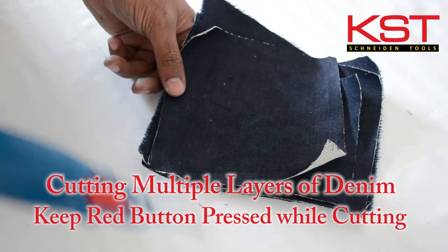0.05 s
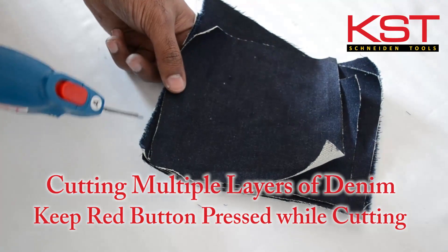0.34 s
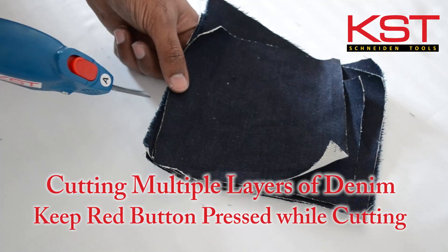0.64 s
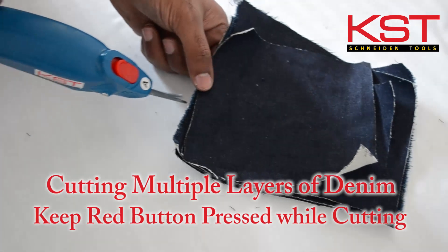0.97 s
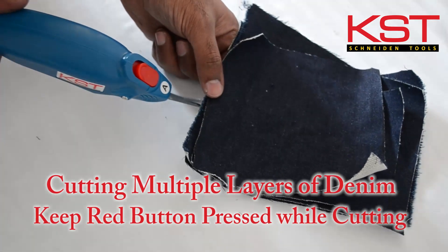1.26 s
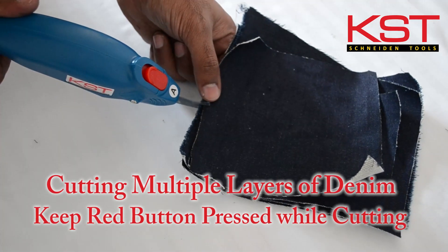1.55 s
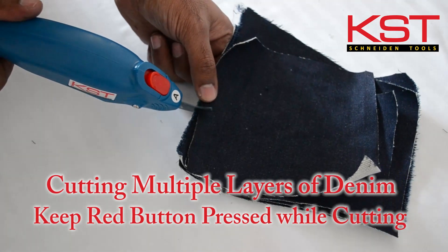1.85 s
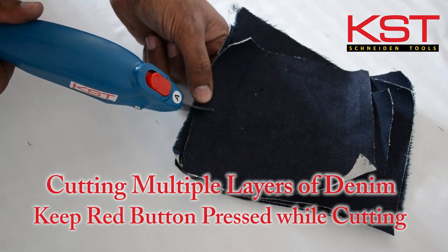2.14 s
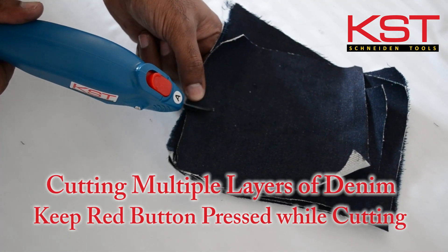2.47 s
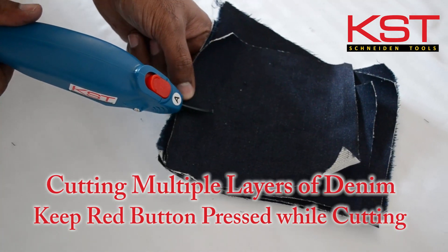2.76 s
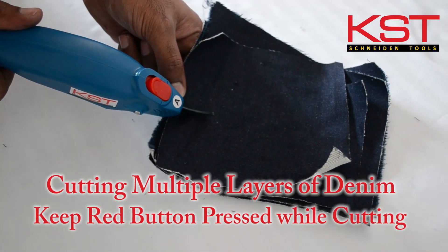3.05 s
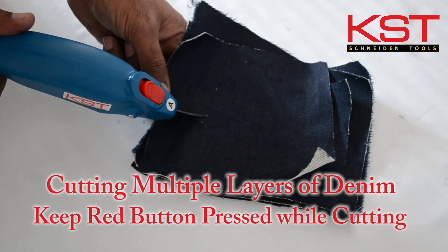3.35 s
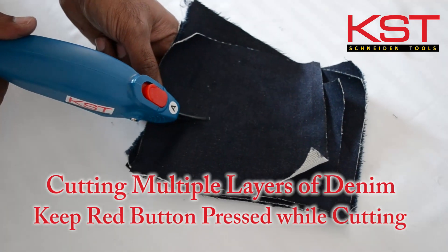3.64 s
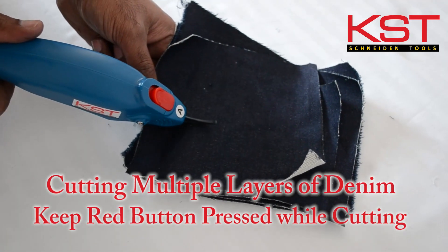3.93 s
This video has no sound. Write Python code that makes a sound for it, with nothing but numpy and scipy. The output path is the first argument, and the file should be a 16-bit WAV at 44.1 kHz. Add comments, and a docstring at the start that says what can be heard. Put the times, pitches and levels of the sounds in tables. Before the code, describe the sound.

Handheld electric fabric cutter switching on with a rattling buzz and sawing into stacked cloth.

```python
"""A cordless electric cutter in a stack of denim on a table.
First cloth rustles and a thumb finds the button. At 0.6 s the switch snaps and the motor spins up,
its brushes fizzing. It runs free: the blade shuttles about 73 times a second and knocks at both ends
of each stroke, over a gear whine. From 2 s it bites into the cloth: the motor sags, the return knock
comes later, and each forward stroke rasps and rings the blade."""
import sys
import numpy as np
from scipy import signal
from scipy.fft import rfft, irfft
from scipy.io import wavfile

SR = 44100
rng = np.random.default_rng(int(sys.argv[2]) if len(sys.argv) > 2 else 0)


def bounce(signal):
    """Save signal as a 16-bit WAV file at the path given by the first command-line argument."""
    frames = np.transpose(np.atleast_2d(signal))
    limited = np.clip(frames, -1, 1)
    pcm = np.round(limited * 32767).astype(np.int16)
    wavfile.write(sys.argv[1], SR, pcm)


N = 176400
T = np.arange(N) / SR
ON_S = .593


def amp(db):
    """Decibels to gain."""
    return 10 ** (np.asarray(db) / 20)


def unit(x):
    """Scales to rms 1."""
    return x / np.sqrt(np.mean(x ** 2) + 1e-20)


def curve(points):
    """Linear interpolation of (t/s, value) points."""
    return np.interp(T, *np.transpose(points))


def colour(x, points, size=4096):
    """Minimum-phase filter through (f/Hz, level/dB) points."""
    hz, db = np.transpose(points)
    log_hz = np.log(np.fft.rfftfreq(size, 1 / SR) + 1)
    cepstrum = irfft(np.log(amp(np.interp(log_hz, np.log(hz), db))))
    cepstrum[1:size // 2] *= 2
    cepstrum[size // 2 + 1:] = 0
    return signal.oaconvolve(x, irfft(np.exp(rfft(cepstrum))))[:N]


def resonate(x, hz, q):
    """One resonance, output at rms 1."""
    return unit(signal.lfilter(*signal.iirpeak(hz, q, SR), x))


def noise(grain_db=0):
    """White noise, gritty when its sample sizes are spread."""
    white, grain = rng.standard_normal((2, N))
    return unit(white * amp(grain_db * grain))


def drift(hz):
    """Random wander up to about hz."""
    low_pass = np.exp(-(np.fft.rfftfreq(N, 1 / SR) / hz) ** 2)
    return unit(irfft(rfft(noise()) * low_pass, N))


# room tone spectrum: f/Hz, level/dB
AIR_SPECTRUM = [(25, -17), (80, -6.5), (160, 5), (300, -3), (600, 2), (1000, 3.5), (1400, 0), (2400, -7.5),
                (2730, 7), (3100, -7.5), (5000, -13), (8000, -20), (9500, -16), (16000, -47)]

def room_tone(level_db=-62):
    """Faint steady noise of the room."""
    return amp(level_db) * unit(colour(noise(), AIR_SPECTRUM))


def reflections(x, level_db=-7, t60_s=.39, gap_s=.002):
    """Short tail scattered by table and walls."""
    t = T[:SR // 2]
    tail = rng.standard_normal(len(t)) * (t > gap_s) * amp(-60 * t / t60_s)
    return amp(level_db) * signal.oaconvolve(x, tail / np.linalg.norm(tail))[:N]


# cloth rustle spectrum: f/Hz, level/dB
RUSTLE_SPECTRUM = [(30, -36), (105, -26), (155, 9.5), (220, -4.5), (320, 2.5), (400, -3), (500, -3),
                   (650, -6), (1000, -3), (1600, -8), (1950, 4.5), (2350, -12), (4000, -20.5), (7000, -27),
                   (8000, -25), (9500, -21), (16000, -33)]

def rustle(level_db=-49.5, fade_db_per_s=51):
    """Cloth rustle dies away as the hand settles on the stack."""
    return amp(level_db - fade_db_per_s * T) * unit(colour(noise(), RUSTLE_SPECTRUM))


# thumb and switch ticks: t/s, level/dB, rise/s, decay/s, f/Hz, Q
SWITCH_TICKS = [(.121, -52, .003, 0.0064, 4000, 2.8), (0.356, -59.5, .002, 0.0065, 5000, 1.7),
                (.532, -49.5, .006, 0.016, 990, 2.2), (.558, -44, 0.0071, 0.006, 3000, .6),
                (.593, -17.5, 0.0002, 0.00085, 5600, .8)]

def switch():
    """The thumb finds the button, then the switch snaps."""
    out = np.zeros(N)
    for start_s, db, rise_s, decay_s, hz, q in SWITCH_TICKS:
        envelope = amp(db) * (1 - np.exp(-T / rise_s)) * np.exp(-T / decay_s)
        tick = envelope * resonate(noise(), hz, q)
        start = round(start_s * SR)
        out[start:] += tick[:N - start]
    return out


def brushes(level_db=-36.5, decay_s=.25):
    """Motor brushes fizz in the surge of current at the start."""
    surge = (T >= ON_S) * np.exp(-abs(T - ON_S) / decay_s)
    return amp(level_db) * surge * resonate(noise(), hz=8900, q=14)


# gear noise spectrum: f/Hz, level/dB
GEAR_SPECTRUM = [(50, -33.5), (200, -36), (500, -11), (700, -15), (860, 3), (1050, -6), (1350, -16.5),
                 (1800, 9.5), (2250, 4.5), (2700, 10), (3100, 5), (4000, 12), (4800, 4), (6300, -7.5),
                 (7100, -5), (7900, -2), (9100, 6), (9700, 0), (16000, -26)]

def gears(pace, level_db=-29.5):
    """Sliding noise of the gears, growing with speed."""
    return pace ** .37 * amp(level_db) * unit(colour(noise(), GEAR_SPECTRUM))


# motor and gear tones: multiple of stroke rate, free level/dB, loaded level/dB
WHINE_ORDERS = [(3, -85, -74), (4, -66.5, -69), (5, -72.5, -65), (8, -66.5, -61), (9, -71, -63.5),
                (10, -55.5, -72), (11, -49, -51), (12, -42.5, -41), (13, -53, -50), (14, -55, -51.5),
                (15, -56, -55), (16, -58, -49.5), (18, -54.5, -46), (19, -66.5, -52.5), (20, -49, -43),
                (21, -60, -51), (22, -51, -44), (28, -39.5, -40)]

def whine(turns, load, pace):
    """Clean tones of motor and gears, growing steeply with speed."""
    tones = np.zeros(N)
    for order, free_db, loaded_db in WHINE_ORDERS:
        phase = 2 * np.pi * order * turns + order ** 2  # offset keeps the tones out of step
        tones += amp(free_db + (loaded_db - free_db) * load) * np.sin(phase)
    return pace ** 3.6 * np.sqrt(2) * tones


# rasp against depth of cut: t/s, level/dB
CUT_DEPTH = [(1.85, -25), (2.07, -3.5), (2.25, -2), (2.5, -2), (3.05, -1.1), (3.5, -1.6), (4.0, -2.4)]
# spectrum of teeth sawing threads: f/Hz, level/dB
RASP_SPECTRUM = [(100, -46), (600, -24), (1000, -9), (1500, -5), (2300, 1), (3200, 0.5), (3700, 0),
                 (4150, 3), (4550, -5.5), (5000, 4.5), (5400, 2), (5800, 6.5), (6300, 0), (6750, 4.5),
                 (7100, -6.5), (7450, 6.5), (7850, -5), (8250, 1.5), (9300, -0.5), (16000, -14)]
# blade modes: f/Hz, width/Hz, final gain/dB, growth/(dB/s)
BLADE_MODES = [(8800, 260, -27.5, 6.5), (4035, 130, -30, 15), (15060, 160, -37, 2.5)]

def cutting(turns, rasp_db=-29.5, centre_turns=.73, width_turns=.086):
    """Once a stroke the teeth tear threads; the cloth rubs the blade, which rings more as it sinks in."""
    offset = (turns - centre_turns + .5) % 1 - .5
    depth = amp(curve(CUT_DEPTH) - .1 * drift(hz=40))
    stroke = depth * np.exp(-.5 * (offset / width_turns) ** 2)
    out = amp(rasp_db) * unit(colour(stroke * noise(grain_db=1), RASP_SPECTRUM))
    for hz, width_hz, db, growth_db_per_s in BLADE_MODES:
        ring = resonate(stroke * noise(), hz, q=hz / width_hz)
        out += ring * amp(db + growth_db_per_s * (T - T[-1]))
    return out


def impacts(turns, scatter_s, spread_db=.42, half_taps=8):
    """One slightly uneven impulse per turn, placed between samples by a windowed sinc."""
    before = np.flatnonzero(np.diff(np.floor(turns)) > 0)
    fraction = (np.ceil(turns[before]) - turns[before]) / (turns[before + 1] - turns[before])
    late, loud = rng.standard_normal((2, N))[:, :len(before)]
    position = before + fraction + late * scatter_s * SR
    taps = position.astype(int)[:, None] + np.arange(-half_taps, half_taps + 1)
    gap = taps - position[:, None]
    pulses = np.sinc(gap) * np.sinc(gap / (half_taps + 1)) * amp(spread_db * loud)[:, None]
    out = np.zeros(N)
    np.add.at(out, np.clip(taps, 0, N - 1), pulses)
    return out


# linkage chatter spectrum: f/Hz, level/dB
CHATTER_SPECTRUM = [(100, -64.5), (500, -32.5), (850, -9.5), (1350, -6), (1800, -15.5), (2250, 2.5),
                    (2650, -7), (3000, -3.5), (3400, -3.5), (3700, -4.5), (4150, 7.5), (4420, -7.5),
                    (4730, 3.5), (5500, -1), (6450, -6.5), (7100, -0.5), (7800, -5.5), (8280, 0.5),
                    (8600, -3), (9400, -3.5), (16000, -4)]

def linkage(hits, rise_s=.00046, decay_s=.00074):
    """The loose linkage chatters briefly after each hit."""
    t = T[:SR // 10]
    burst_power = (1 - np.exp(-t / rise_s)) * np.exp(-t / decay_s)
    envelope = np.sqrt(abs(signal.oaconvolve(hits ** 2, burst_power)[:N]))
    return unit(colour(envelope * noise(grain_db=3.2), CHATTER_SPECTRUM))


def disperse(x, travel_s=.0008974, at_hz=2295):
    """Bending waves carry treble faster than bass, which rounds each knock."""
    hz = np.fft.rfftfreq(2 * N, 1 / SR)
    lag_cycles = 2 * travel_s * np.sqrt(at_hz * hz)
    return irfft(rfft(x, 2 * N) * np.exp(-2j * np.pi * lag_cycles))[:N]


# housing response: f/Hz, level/dB
HOUSING_RESPONSE = [(60, -61), (300, -46), (650, -34), (850, -13), (1200, -18), (1700, -17), (1950, -1),
                    (2080, -5.5), (2170, 5.5), (2330, 2), (2680, 3.5), (3000, -7), (3300, -2.5), (3700, -4),
                    (4400, -6), (4800, 0), (5600, -5.5), (6500, -9), (7100, -14.5), (9500, -25),
                    (16000, -30)]
# housing modes: f/Hz, level/dB, t60/s
HOUSING_RING = [(2200, -35, 0.014), (2307, -46.5, 0.055), (2340, -35, 0.013), (2662, -45.5, 0.14),
                (3690, -33, 0.032), (3950, -51, 0.065), (4400, -32, 0.05), (4720, -33, .025),
                (7140, -14, 0.0079), (8400, -37, .018)]

def housing(hits):
    """The plastic housing rings and colours each hit."""
    t = T[:SR // 10]
    ring = sum(amp(db - 60 * t / t60_s) * np.cos(2 * np.pi * hz * t) for hz, db, t60_s in HOUSING_RING)
    struck = hits + signal.oaconvolve(hits, ring)[:N]
    return unit(disperse(colour(struck, HOUSING_RESPONSE)))


# stroke ends: free angle/turns, loaded angle/turns, free level/dB, loaded level/dB, scatter/s
STROKE_ENDS = [(.525, .525, 0, 2, 0.000013), (.91, 1.12, 0.5, 0.5, 0.000019)]
# knock force as grip and pressure change: t/s, level/dB
GRIP_FORCE = [(.7, -0.5), (1.2, .3), (1.6, -1), (2.1, -0.5), (2.45, 1), (2.9, 0.7), (3.1, 1.2), (4.0, 0.5)]

def knocks(turns, load, housing_db=-26.5, chatter_db=-28):
    """The blade carrier strikes both ends of its travel, exciting housing and linkage."""
    hits = np.zeros(N)
    for free_turns, loaded_turns, free_db, loaded_db, scatter_s in STROKE_ENDS:
        end_turns = free_turns + (loaded_turns - free_turns) * load
        force = amp(free_db + (loaded_db - free_db) * load)
        hits += force * impacts(turns - end_turns, scatter_s)
    return amp(housing_db + curve(GRIP_FORCE)) * housing(hits) + amp(chatter_db) * linkage(hits)


# motor speed: t/s, stroke rate/Hz
STROKE_RATE = [(.593, 10), (.62, 45), (.66, 66), (.7, 71.4), (.75, 73.2), (.85, 73.9), (1.3, 74.05),
               (2.05, 74.2), (2.38, 72.3), (2.94, 71.9), (3.14, 72.4), (3.47, 71.85), (3.82, 72.1),
               (4.0, 71.9)]
# cloth drag on the blade: t/s, load (0-1)
CLOTH_DRAG = [(1.7, 0.06), (2.0, .2), (2.17, 0.75), (2.4, 0.86), (3.1, 0.97), (4.0, 1)]

def scene():
    """One crank angle drives knocks, rasp and whine; all swell as the motor spins up."""
    stroke_hz = curve(STROKE_RATE) * (T >= ON_S) * (1 + .001463 * drift(hz=13.4))
    turns = np.cumsum(stroke_hz) / SR
    pace = stroke_hz / stroke_hz.max()
    load = curve(CLOTH_DRAG)
    clatter = gears(pace) + pace ** .41 * (knocks(turns, load) + cutting(turns))
    clatter += brushes() + rustle() + switch()
    return (room_tone() + reflections(clatter) + whine(turns, load, pace) + clatter)[None]


# microphone response, notched in the top treble: f/Hz, level/dB
MIC_RESPONSE = [(9500, -0.5), (10300, -9), (11000, -22), (11600, -25.5), (12100, -59), (12550, -23),
                (13300, -27), (14200, -14.5), (15200, -18.5), (15800, -30)]

def record(dry):
    """Microphone colour, then the band limit."""
    edge_hz = 15950
    low_pass = signal.firwin(511, edge_hz, window=("kaiser", 9), fs=SR)
    return signal.oaconvolve(colour(dry[0], MIC_RESPONSE), low_pass, "same")[None]


dry = scene()
out = record(dry)
bounce(out)
```